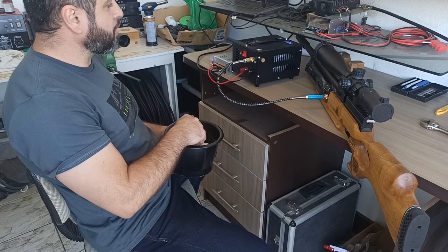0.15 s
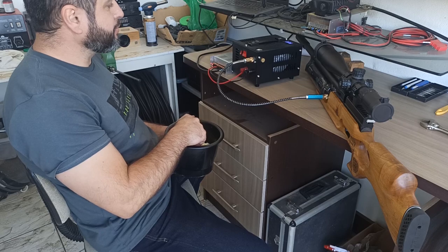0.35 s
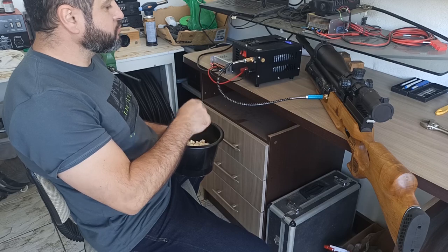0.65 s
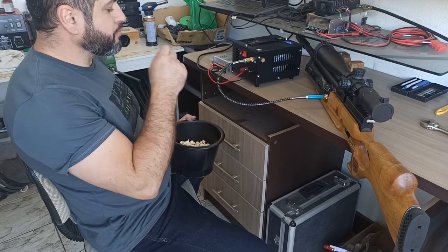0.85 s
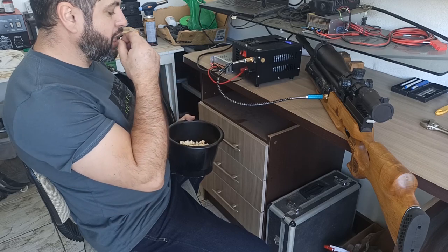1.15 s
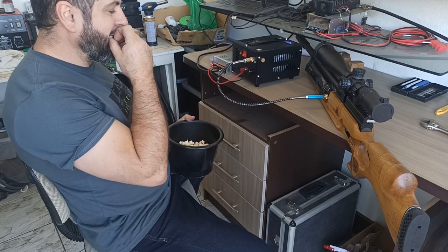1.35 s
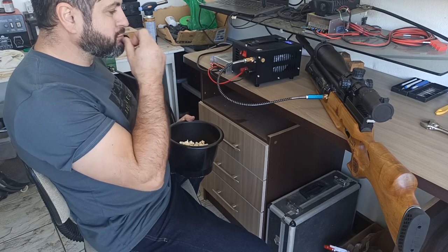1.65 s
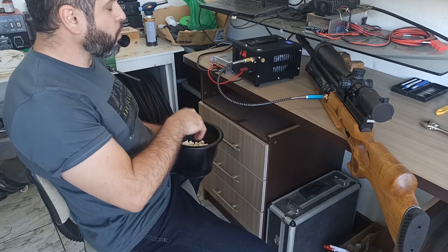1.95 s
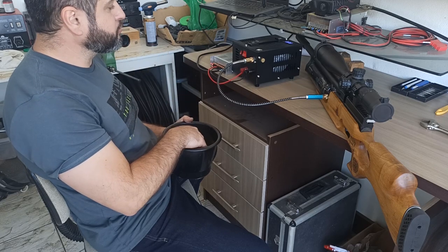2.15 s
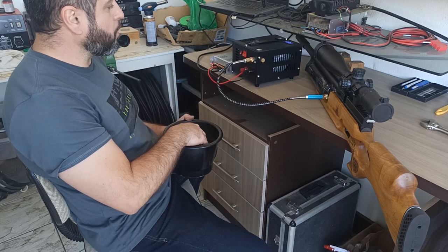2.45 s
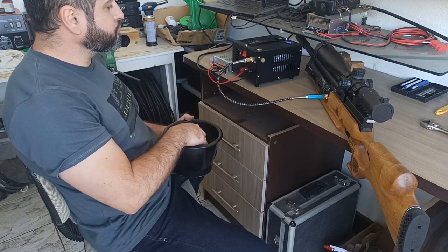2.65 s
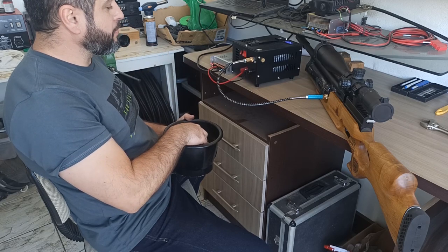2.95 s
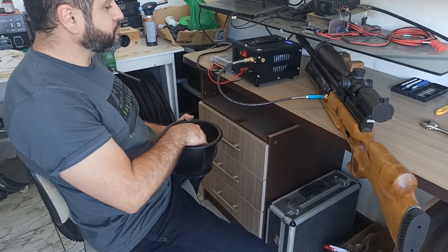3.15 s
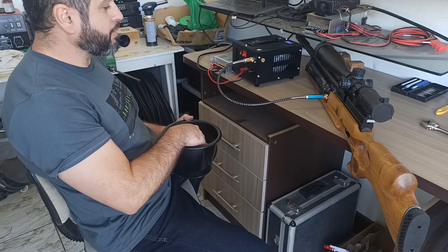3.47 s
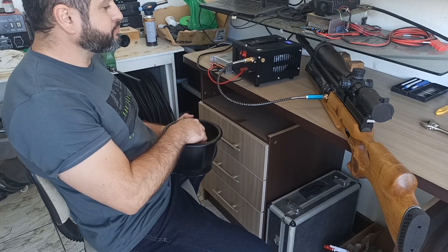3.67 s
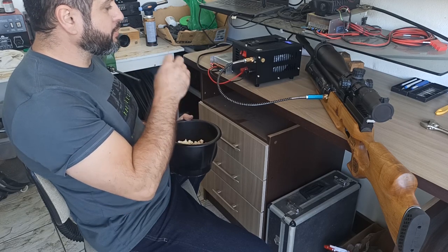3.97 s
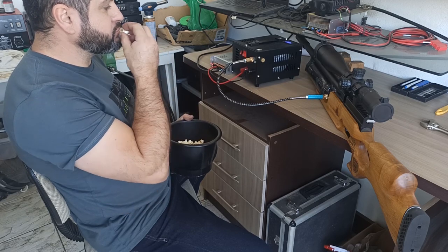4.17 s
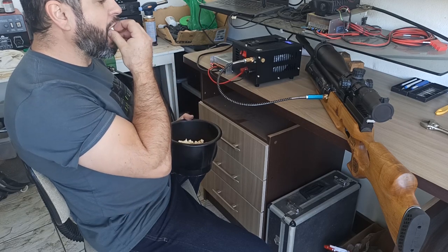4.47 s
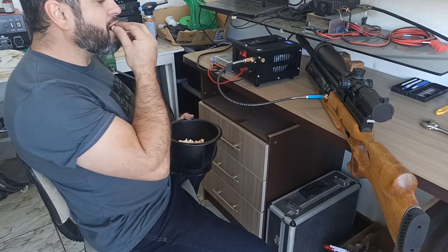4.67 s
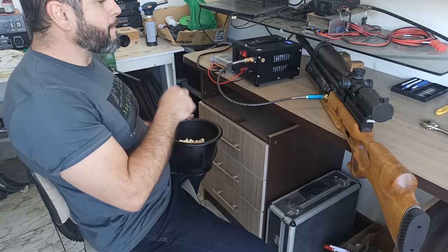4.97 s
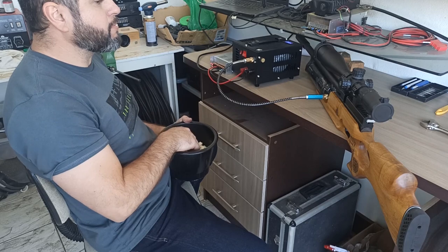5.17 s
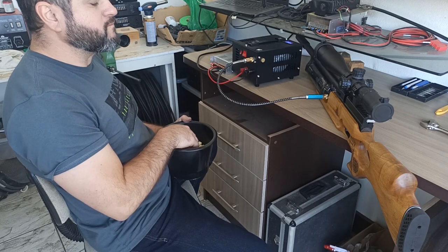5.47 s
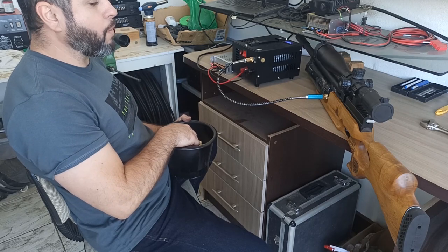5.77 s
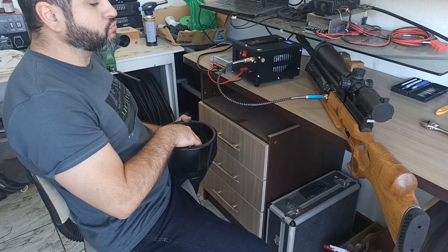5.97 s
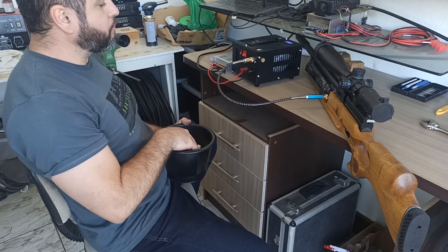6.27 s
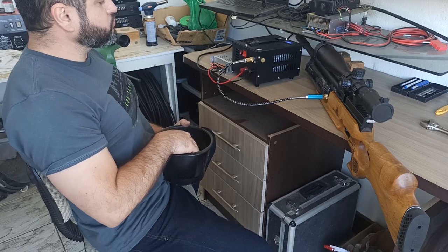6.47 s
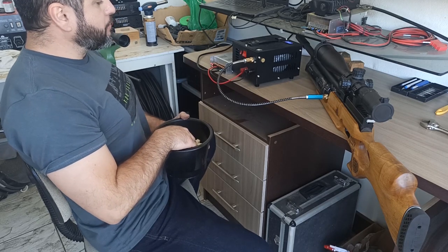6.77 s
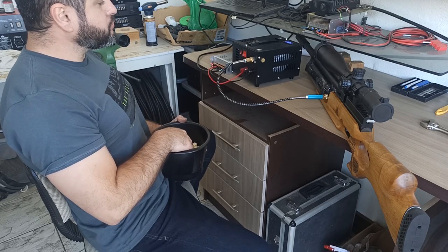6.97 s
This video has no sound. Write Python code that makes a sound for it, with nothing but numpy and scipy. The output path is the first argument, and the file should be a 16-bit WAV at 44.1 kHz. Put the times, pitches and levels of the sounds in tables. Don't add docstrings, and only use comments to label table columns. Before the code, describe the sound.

A small geared air compressor runs steadily on a workbench, a loud rattling metallic roar pulsing about five times a second, with valve hiss and faint whine.

```python
import sys
import numpy as np
from scipy import signal
from scipy.fft import rfft, irfft, next_fast_len
from scipy.io import wavfile
from scipy.ndimage import map_coordinates

SR = 44100
rng = np.random.default_rng(int(sys.argv[2]) if len(sys.argv) > 2 else 0)


def unload_wav(signal):
    wavfile.write(
        sys.argv[1],
        SR,
        np.round(np.clip(np.atleast_2d(signal).T, -1, 1) * 32767).astype(np.int16),
    )


def field_ratio(decibels):
    return 10 ** (np.asarray(decibels, dtype=float) / 20)


N = 313992
TURN_HZ = 5.177


def unit(x):
    return x / np.sqrt(np.mean(x ** 2) + 1e-20)


def along(points, hz):
    f, v = np.transpose(points)
    return np.interp(np.log(hz + 1), np.log(f + 1), v)


def wobble(rate):
    knots = rng.standard_normal(int(N * rate / SR) + 4)
    return map_coordinates(knots, [np.arange(N) * rate / SR])


def filtered(x, response):
    m = next_fast_len(N + SR // 2)
    return irfft(rfft(x, m) * response(np.fft.rfftfreq(m, 1 / SR)), m)[..., :N]


def stereo(pair, gain):
    # f/Hz, correlation [-1..1]
    likeness = [(30, .72), (70, 0.985), (130, 0.97), (290, 0.84), (640, 0.67), (1410, 0.26), (3100, 0.11),
                (6820, -0.02), (15000, 0.06)]

    def spread(hz):
        angle = np.arccos(np.clip(along(likeness, hz), -1, 1)) / 2
        return gain(hz) * np.array([np.cos(angle), np.sin(angle)])

    mid, side = filtered(pair, spread)
    return unit(np.array([mid + side, mid - side]))


def turn_time(start_s):
    # t/s, delay/s
    slip = [(0, -.001), (1.5, 0), (2.2, -.0005), (3.8, .0012), (5.5, .0005), (7.12, -.0008)]
    t = np.arange(N) / SR
    late_s = np.interp(t, *np.transpose(slip))
    turns = (t - late_s - start_s) * TURN_HZ + 1
    return turns % 1 / TURN_HZ, turns.astype(int)


def ring(t, hz, rise_s):
    envelope = (t / rise_s * np.exp(1 - t / rise_s)) ** 2
    return envelope * np.sin(2 * np.pi * hz * t)


def contacts():
    # f/Hz, lag/s, first peak level/dB, second peak level/dB
    slap_modes = [(758, 0, -25, -27), (673, 0, -29, -20.5)]
    rod_modes = [(358, -.001, -30.5, -41), (396, 0, -38, -27.5), (498, .002, -26, -29)]
    gear_modes = [(1052, -.069, -33, -33), (690, -.041, -32, -38), (632, -.024, -33, -32),
                  (862, -.013, -33, -36), (759, -.001, -36, -31), (489, .004, -42, -40),
                  (668, .006, -25.5, -30), (256, .007, -37, -39)]

    def strike_twice(modes, first_s, apart_s, rise_s):
        rows = []
        for hz, lag_s, first_db, second_db in modes:
            rows.append((first_s + lag_s, hz, rise_s, first_db))
            rows.append((first_s + lag_s + apart_s, hz, rise_s, second_db))
        return rows

    slap = strike_twice(slap_modes, first_s=.006, apart_s=.112, rise_s=.016)
    rod = strike_twice(rod_modes, first_s=.024, apart_s=.078, rise_s=.010)
    gear = strike_twice(gear_modes, first_s=.078, apart_s=.097, rise_s=.009)
    rebound_s, rebound_db = .026, -3
    again = [(s + rebound_s, hz, rise_s, db + rebound_db) for s, hz, rise_s, db in rod]
    return slap + rod + again + gear


def strokes():
    out = np.zeros(N)
    for peak_s, hz, rise_s, db in contacts():
        t, turn = turn_time((peak_s - rise_s) % (1 / TURN_HZ))
        force_db = 1.3 + 1.1 * rng.standard_normal(40)
        out += field_ratio(db + force_db[turn]) * ring(t, hz, rise_s)
    return out


def case_gain(hz):
    # f/Hz, bandwidth/Hz, level/dB
    case_modes = [(111, 33, -27), (239, 15, -16.5), (268.5, 23.6, -14.5), (361, 12, -20), (392.5, 26, -12),
                  (461.7, 6.7, -4), (510, 25, -7), (627.4, 12, -7), (672.6, 8.6, 0), (748, 15, -6),
                  (792.4, 11, 0), (843.4, 41, -6), (883, 30, -7), (935, 59, -11.5), (1003, 20, -8),
                  (1047, 31, -7), (1260, 23, -15), (1294, 16, -14), (1483, 40, -15.5), (1490, 47, -22),
                  (1684, 85, -12.5), (1930, 33, -12), (2057, 26, -14.5), (2152, 59, -18), (2319, 22, -9),
                  (2545, 100, -16), (3196, 29, -14), (3640, 320, -15.5), (4544, 52, -14.5), (4830, 39, -12)]
    # f/Hz, density level/dB per Hz
    radiation = [(30, -67), (80, -36), (150, -27), (320, -25), (440, -15.5), (590, -14), (720, -14.5),
                 (950, -15.5), (1400, -16), (2500, -41.5), (5000, -55)]
    peaks = sum(field_ratio(db) ** 2 / (1 + (2 * (hz - centre) / width) ** 2) ** 2
                for centre, width, db in case_modes)
    return np.sqrt(peaks + field_ratio(along(radiation, hz)) ** 2)


def rattle():
    once = rng.standard_normal((2, int(SR / TURN_HZ) + 2))
    t = turn_time(0)[0]
    repeated = once[:, (t * SR).astype(int)]
    locked = stereo(repeated, lambda hz: case_gain(hz) / (1 + (hz / 2000) ** 4))
    loose = stereo(rng.standard_normal((2, N)), case_gain)
    load_db = .6 * np.cos(4 * np.pi * TURN_HZ * (t - .018))
    drift_db = 0.28 * wobble(3.22) + 0.97 * wobble(13)
    return field_ratio(-28.5) * locked + field_ratio(-24 + load_db + drift_db) * loose


def air():
    # f/Hz, density level/dB per Hz
    fan_colour = [(700, -33), (1500, 0.5), (2200, -2.5), (2800, -3.5), (3200, 2.5), (3900, -4),
                  (4600, -0.5), (6200, -1.5), (6750, -1.5), (7200, -3), (16000, -6)]
    # f/Hz, density level/dB per Hz
    jet_colour = [(1500, -21), (2500, 3.5), (4000, 1), (6000, -7), (8000, -18), (12000, -2), (16000, -1)]

    def burst(start_s, db, spread_db, attack_s, decay_s):
        t, turn = turn_time(start_s)
        level = field_ratio(db + spread_db * rng.standard_normal(40)[turn])
        return level * (1 - np.exp(-t / attack_s)) * np.exp(-t / decay_s)

    rush = stereo(rng.standard_normal((2, N)), lambda hz: field_ratio(along(fan_colour, hz)))
    hiss = stereo(rng.standard_normal((2, N)), lambda hz: field_ratio(along(jet_colour, hz)))
    knock = stereo(rng.standard_normal((2, N)), lambda hz: 1 / (1 + ((hz - 2600) / 900) ** 4))
    puff = burst(.0845, db=-20.5, spread_db=1.33, attack_s=.00071, decay_s=.03)
    low_puff = burst(.003, db=-30.5, spread_db=1.8, attack_s=.0015, decay_s=.023)
    return field_ratio(-21 + 0.53 * wobble(4.94)) * rush + puff * hiss + low_puff * knock


def whine():
    # t/s, f/Hz
    speed = [(0, 1358.8), (2.8, 1357.9), (4.5, 1358.8), (7.12, 1359.5)]
    # multiple, left level/dB, right level/dB, left phase lead/rad
    overtones = [(1, -39, -28, 1.0), (2, -44, -47, -0.5), (3, -52.5, -38, -1.5), (4, -62, -47, 2.5),
                 (5, -45.5, -40, 1.5), (6, -63, -45.5, 3)]
    # multiple of the commutator, level/dB
    slow_tones = [(.2, -49), (.6225, -45)]
    tone_hz = np.interp(np.arange(N) / SR, *np.transpose(speed)) + .35 * wobble(9)
    phase = 2 * np.pi * np.cumsum(tone_hz) / SR
    out = np.zeros((2, N))
    for multiple, db in slow_tones:
        out += field_ratio(db + 4 + 1.7 * wobble(2.3)) * np.sin(multiple * phase)
    for multiple, left_db, right_db, lead in overtones:
        level_db = np.array([[left_db], [right_db]]) + 2.6 + 1.8 * wobble(16)
        out += field_ratio(level_db) * np.sin(multiple * phase + np.array([[lead], [0]]))
    return out


def bench():
    # t/s, level change/dB
    soft = [
        (0, -2),
        (.16, -5),
        (.36, -1),
        (1.32, -4.5),
        (2.29, -4),
        (3.06, -2),
        (3.45, -3),
        (3.64, -4),
    ]
    first_s, boom_hz, boom_db = .157, 108.5, -38.8
    rock_hz, rock_depth = 23.3, .58
    settle_s, settle_span_s, settle_db = 4.5, .7, -4.5
    t, turn = turn_time(first_s)
    start_s = first_s + (np.arange(40) - 1) / TURN_HZ
    level_db = boom_db + settle_db * np.clip((start_s - settle_s) / settle_span_s, 0, 1)
    level_db += sum(db * (abs(start_s - s) < .5 / TURN_HZ) for s, db in soft)
    rocking = 1 + rock_depth * np.cos(2 * np.pi * rock_hz * (t - .035))
    shape = (1 - np.exp(-t / .011)) ** 2 * np.exp(-(t / .117) ** 4)
    return field_ratio(level_db[turn]) * shape * rocking * np.sin(2 * np.pi * boom_hz * t)


def squeak():
    # peak t/s, f/Hz, rise/s, peak level/dB
    panel = [
        (4.87, 2330, .022, -29.5),
    ]
    t = np.arange(N) / SR
    return sum(field_ratio(db) * ring(np.maximum(t - s + rise_s, 0), hz, rise_s)
               for s, hz, rise_s, db in panel)


def standing(x, depth_db, step_hz):
    # f/Hz, level difference/dB
    lean = [(60, -2.5), (110, -1.5), (200, -2), (380, -2.5), (700, 0), (1290, -0.5), (2380, 0), (4400, 1.0),
            (8120, -0.5), (15000, -1)]
    lag_s = 2 / SR
    sides = np.array([[1], [-1]])
    ripple = rng.standard_normal((3, 1000))
    ripple = (ripple[:2] + ripple[2]) / np.sqrt(2)

    def response(hz):
        wavy = np.array([map_coordinates(r, [hz / step_hz], mode="wrap") for r in ripple])
        wave_db = depth_db * wavy * np.clip(hz / 1500, .3, 1) / (1 + hz / 9000)
        lean_db = along(lean, hz) / 2 * sides
        return field_ratio(wave_db + lean_db) * np.exp(-1j * np.pi * hz * lag_s * sides)

    return filtered(x, response)


def room(x):
    # f/Hz, T60/s
    decay = [(100, 0.09), (250, 0.37), (1000, 0.78), (8000, 0.31)]
    hz, t, z = signal.stft(rng.standard_normal((2, SR // 2)), SR, nperseg=256)
    fade_db = -60 * t / along(decay, hz)[:, None]
    tail = signal.istft(z * field_ratio(fade_db), SR, nperseg=256)[1]
    tail = tail / np.linalg.norm(tail[0])
    delayed = np.pad(x, (300, 0))[None]
    return signal.fftconvolve(delayed, tail, axes=1)[:, :N]


def scene():
    pump = strokes()
    direct = pump * field_ratio(np.array([[.8], [-.8]]))
    noise = standing(rattle() + air(), depth_db=2.6, step_hz=20)
    return direct + bench() + field_ratio(-13) * room(pump) + noise + whine() + squeak()


def top_cut(x):
    return signal.sosfilt(signal.butter(12, 15920, fs=SR, output="sos"), x)


def record(dry):
    band_edges = [0, 4760, 6120, 7670, 8050, 8520, 8960, 11590, 15735, 15870]
    # left level/dB, right level/dB
    band_levels = [(-1, -1.5), (-7.5, -9.5), (2, -1.5), (-14.5, -3), (-8.5, -5), (-36, -21.5), (-78, -62),
                   (-17.5, -13), (-42, -38), (-98.5, -95)]

    def response(hz):
        band = np.searchsorted(band_edges, hz, side="right") - 1
        return field_ratio(np.transpose(band_levels)[:, band])

    return top_cut(filtered(dry, response))


dry = scene()
out = record(dry)
unload_wav(out)
```